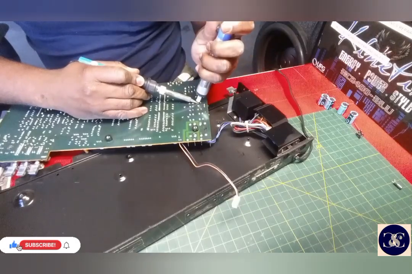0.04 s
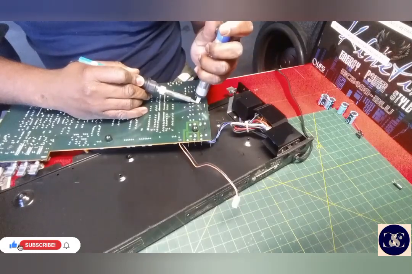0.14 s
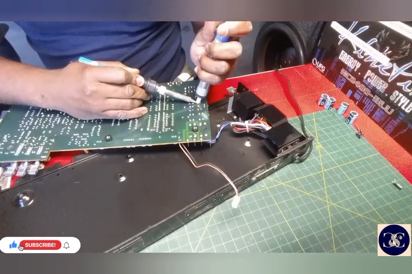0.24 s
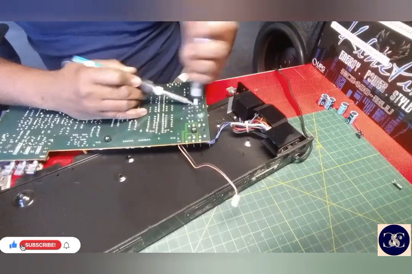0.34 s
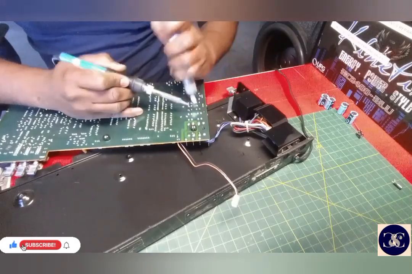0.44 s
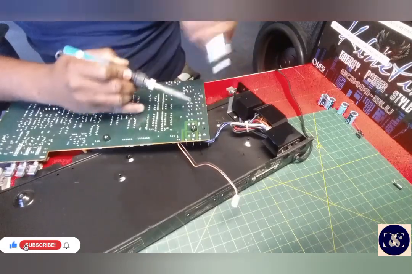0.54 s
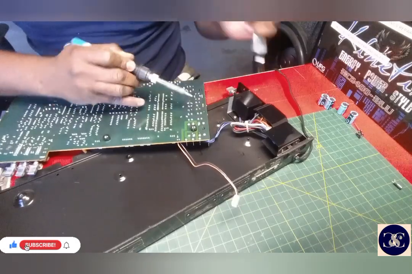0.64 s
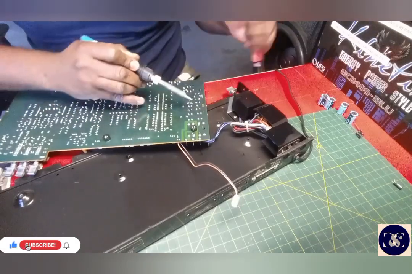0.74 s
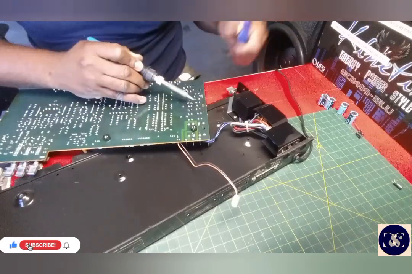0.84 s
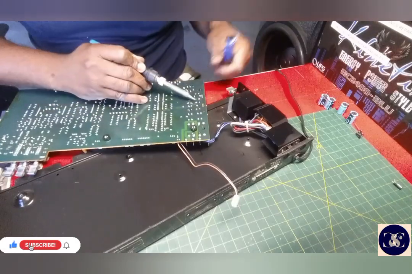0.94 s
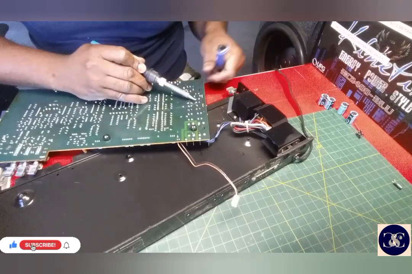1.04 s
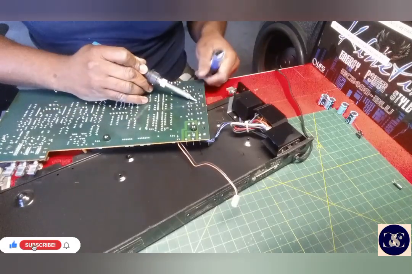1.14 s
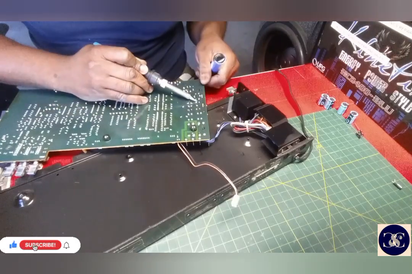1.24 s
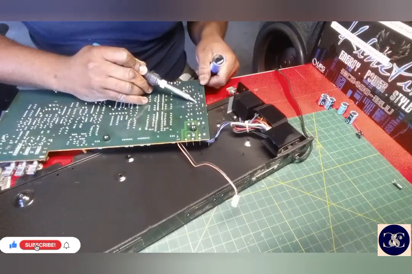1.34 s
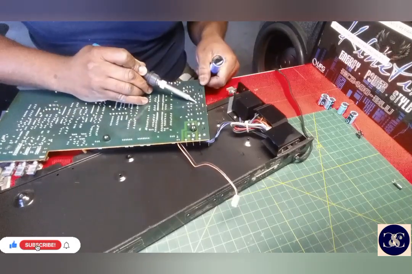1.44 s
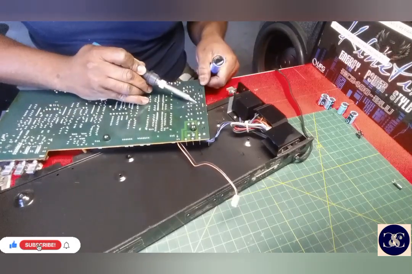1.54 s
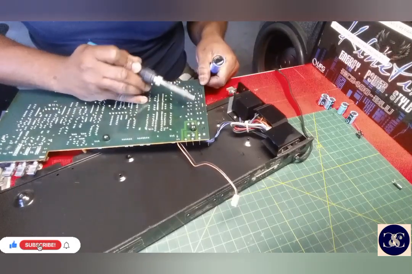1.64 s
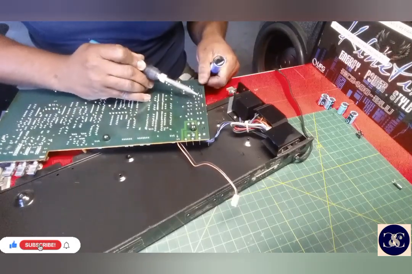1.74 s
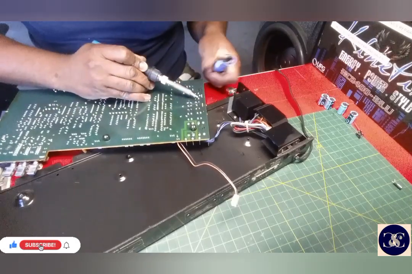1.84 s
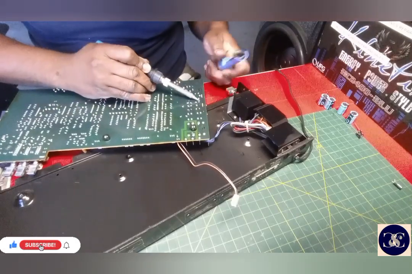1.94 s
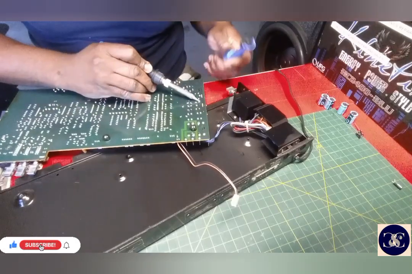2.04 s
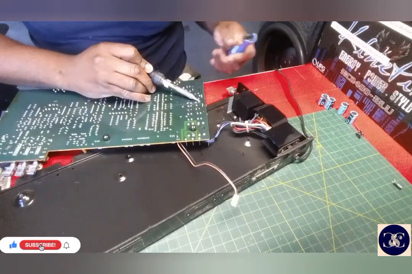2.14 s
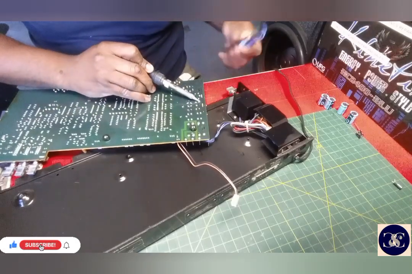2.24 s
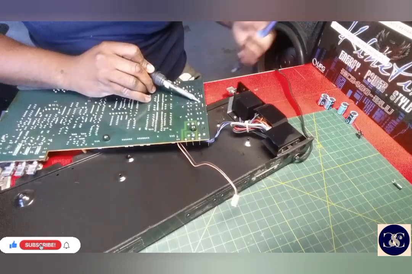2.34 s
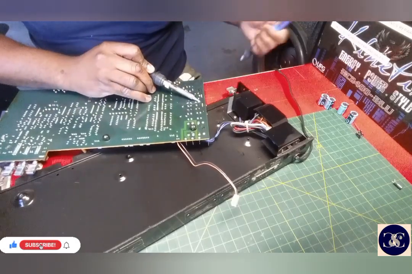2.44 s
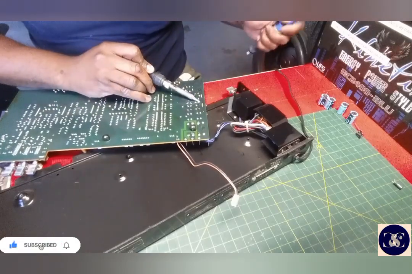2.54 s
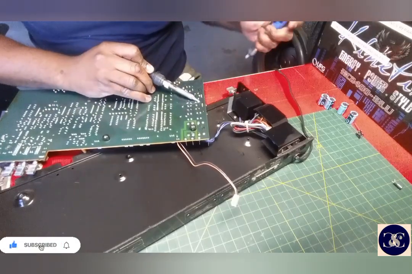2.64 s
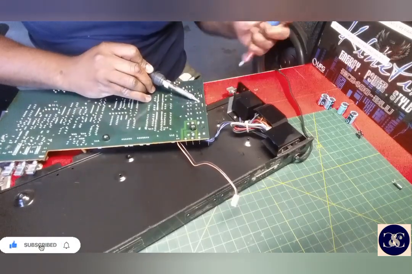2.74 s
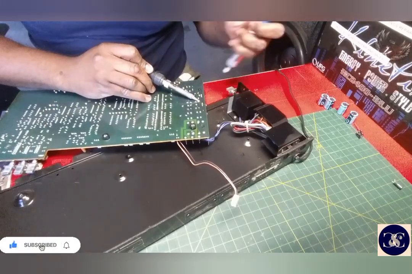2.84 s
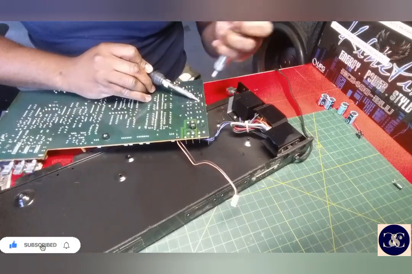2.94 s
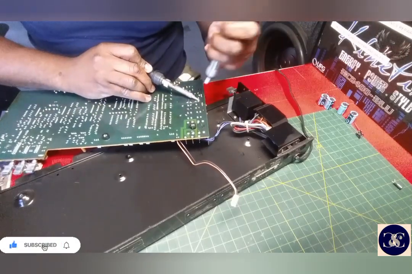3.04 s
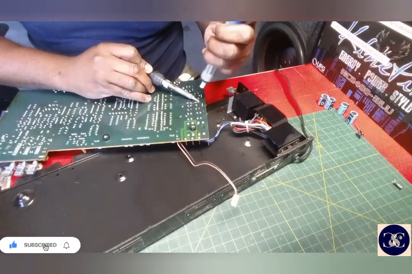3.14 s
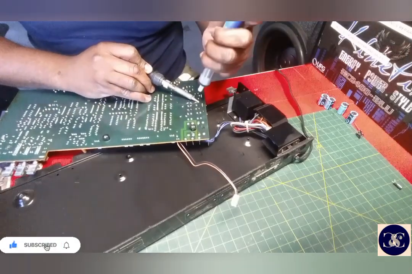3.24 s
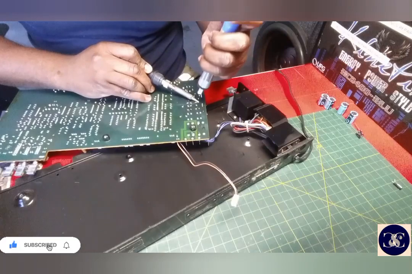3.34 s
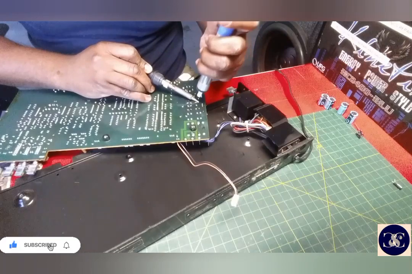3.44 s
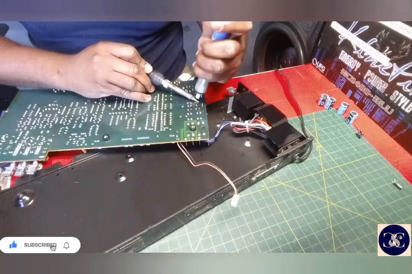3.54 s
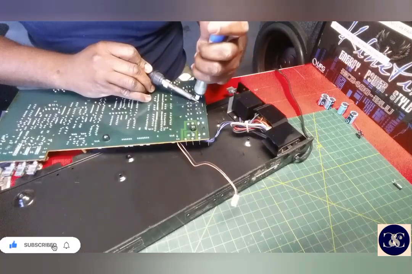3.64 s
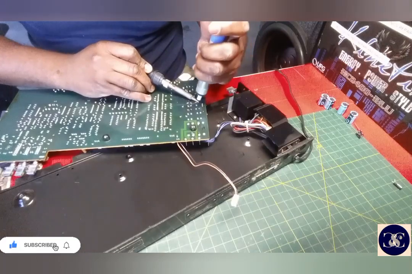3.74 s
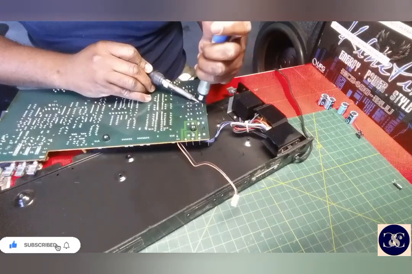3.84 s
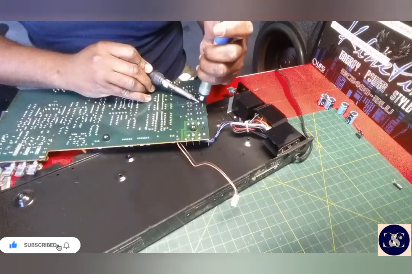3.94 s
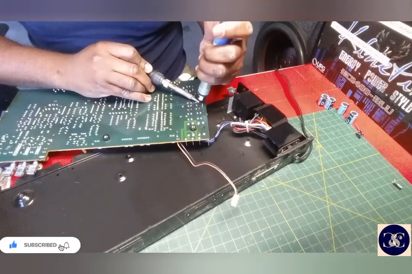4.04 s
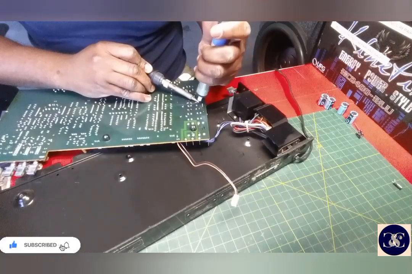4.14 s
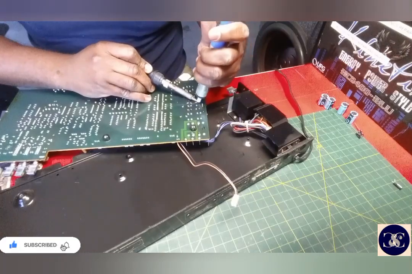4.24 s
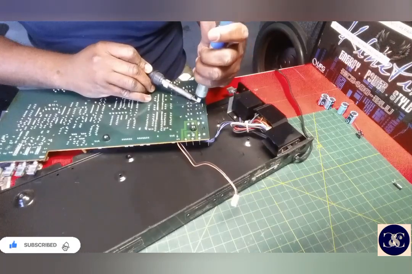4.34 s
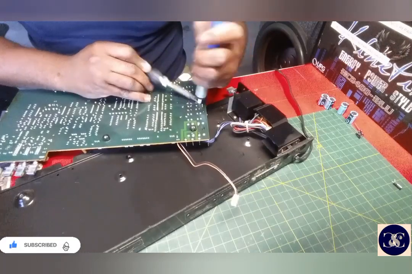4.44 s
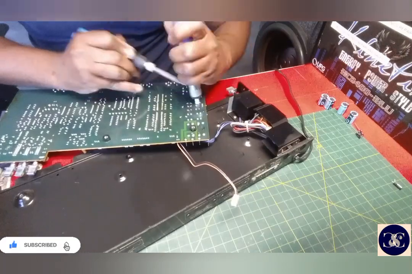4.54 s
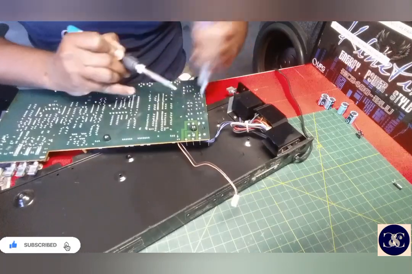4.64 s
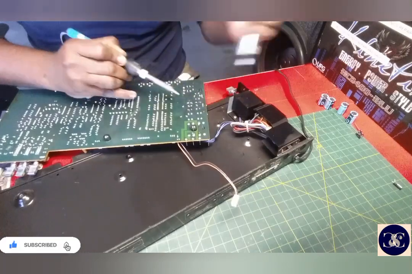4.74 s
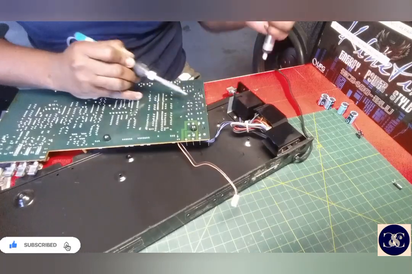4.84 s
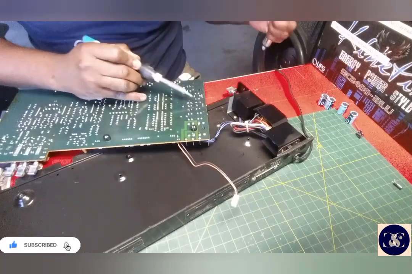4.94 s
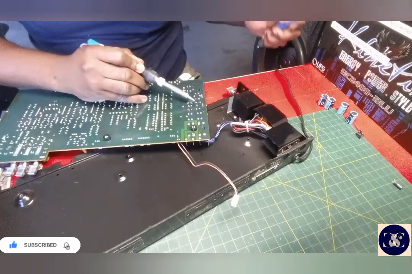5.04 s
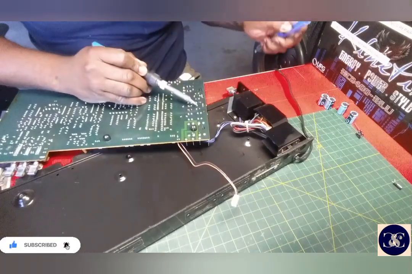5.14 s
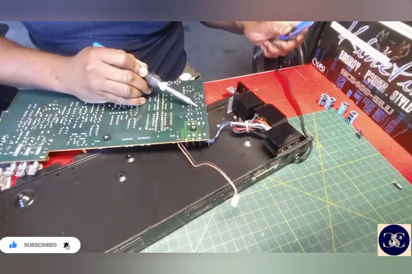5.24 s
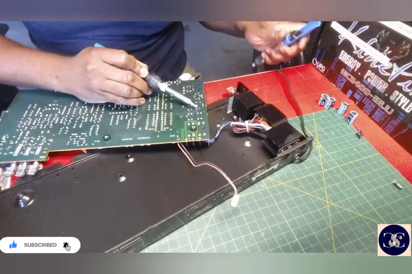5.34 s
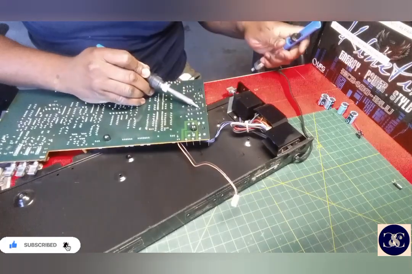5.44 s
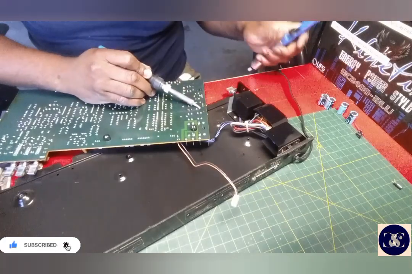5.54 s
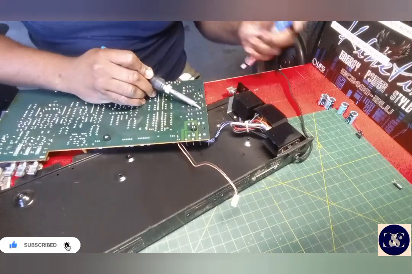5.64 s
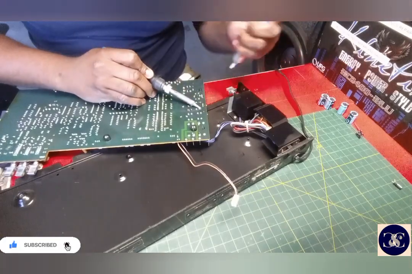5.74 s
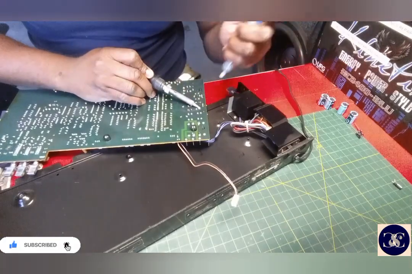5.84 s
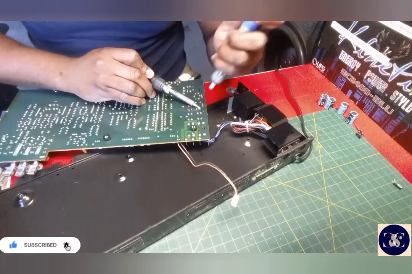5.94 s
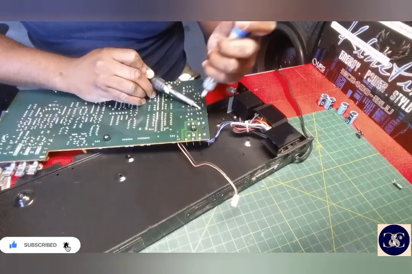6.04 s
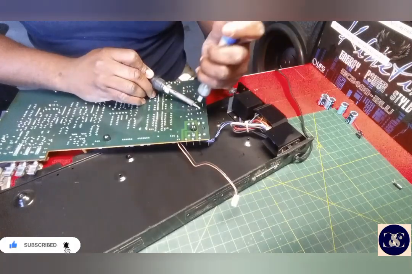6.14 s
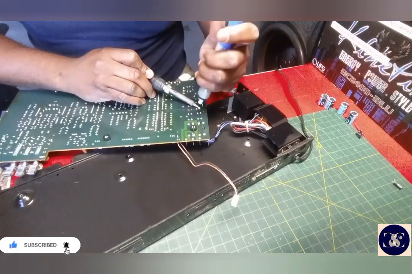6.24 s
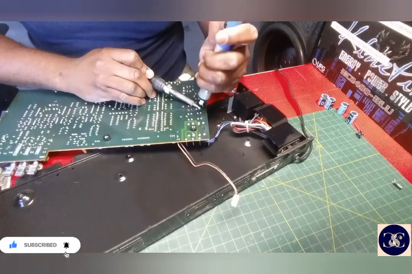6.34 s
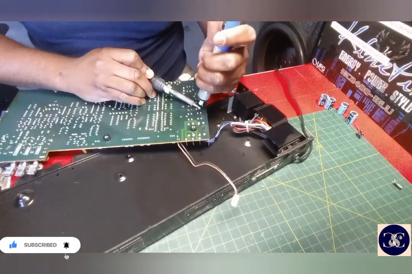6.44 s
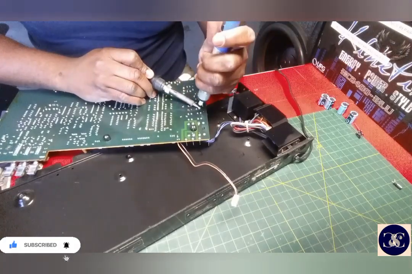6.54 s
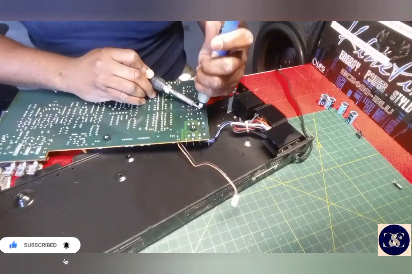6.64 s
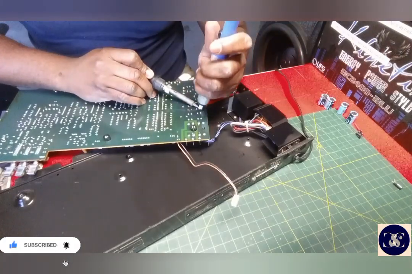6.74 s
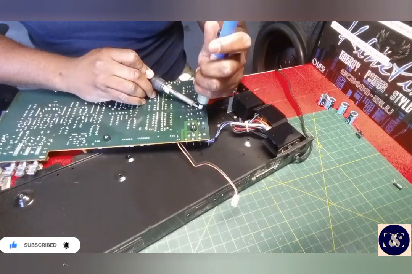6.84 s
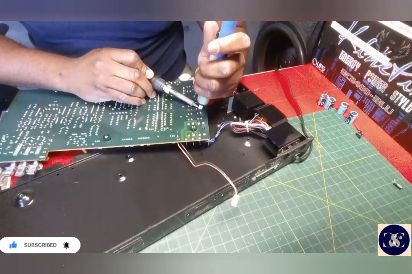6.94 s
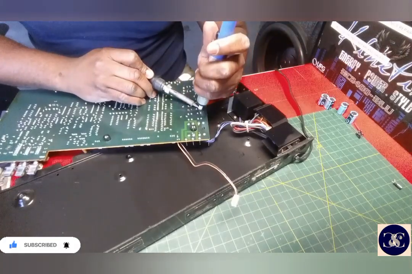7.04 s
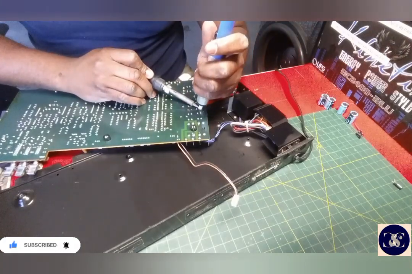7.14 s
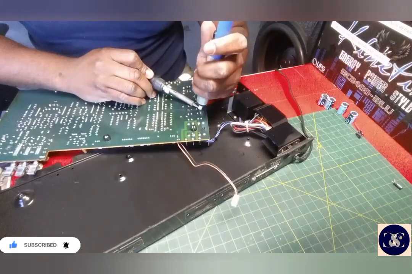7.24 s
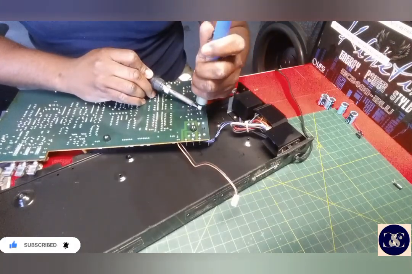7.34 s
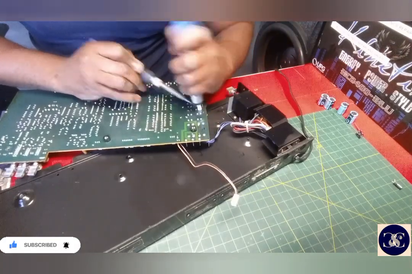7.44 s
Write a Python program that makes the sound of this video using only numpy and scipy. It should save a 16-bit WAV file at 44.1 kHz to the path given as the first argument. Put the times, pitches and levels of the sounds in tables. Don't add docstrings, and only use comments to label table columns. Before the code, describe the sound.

Irregular dry snaps and clicks of a hand-held plunger tool, recorded close in a small, lightly reverberant room. First a shot with thump and board taps, then small chiming knocks and a piercing latch click, then a bigger shot with springy rebound and another catch. Long gaps hold only a fluctuating low hum with faint airy hiss, until one final snap cuts off at the end.

```python
import sys
import numpy as np
from scipy import signal
from scipy.fft import rfft, irfft
from scipy.io import wavfile
from scipy.ndimage import uniform_filter1d

SR = 44100
rng = np.random.default_rng(int(sys.argv[2]) if len(sys.argv) > 2 else 0)


def log_audio(samples):
    frames = np.atleast_2d(samples).T
    limited = np.clip(frames, -1, 1)
    pcm = np.round(limited * 32767).astype(np.int16)
    wavfile.write(sys.argv[1], SR, pcm)


def attenuation_scalar(level_db):
    decades = np.asarray(level_db, float) / 20
    return 10 ** decades


N = 330750
T = np.arange(N) / SR

# centre in Hz, width in Hz, gain in dB.
TREBLE_BANDS = [(9970, 1700, 3), (11900, 6500, 0), (15200, 9700, -7)]
# frequency in Hz, level in dB, t60 in seconds.
BOARD_MODES = [(765, -8.5, 0.084), (1074, -3.5, 0.073), (1230, 1, 0.029), (1331.5, 1, 0.033),
               (1500, 1.5, 0.026), (1910, -8, 0.037), (2144, -4, .04), (2450, -9.5, .04)]


def unit(x):
    return x / np.sqrt(np.mean(x ** 2))


def colour(x, hz, db):
    size = 1 << 13
    log_hz = np.log(np.arange(size // 2 + 1) * SR / size + 1)
    cepstrum = irfft(np.interp(log_hz, np.log(hz), db) * np.log(10) / 20)
    cepstrum[1:size // 2] *= 2
    cepstrum[size // 2 + 1:] = 0
    return signal.oaconvolve(x, irfft(np.exp(rfft(cepstrum))))[:len(x)]


def resonate(x, bands):
    out = 0
    for k, (hz, width, db) in enumerate(bands):
        out = out + (-1) ** k * attenuation_scalar(db) * signal.lfilter(*signal.iirpeak(hz, hz / width, SR), x)
    return out


def ring(x, modes):
    out = 0
    for hz, db, t60 in modes:
        pole = np.exp(2j * np.pi * hz / SR - np.log(1000) / (t60 * SR))
        out = out + attenuation_scalar(db) * signal.lfilter([1], [1, -pole], x).imag
    return out


def bursts(s, db, t60, spiky_db):
    out, t = np.zeros(N), T[:SR // 4]
    uneven = attenuation_scalar(spiky_db * rng.standard_normal((len(s), len(t) // 8 + 1)))
    chance = rng.standard_normal((len(s), len(t))) * uneven.repeat(8, axis=1)[:, :len(t)]
    for at, level, decay, c in zip((s * SR).astype(int), attenuation_scalar(db), np.clip(t60, 0.003, 0.3), chance):
        crack = c * np.exp(-t / min(0.08 * decay, 0.0035))
        rattle = 0.42 * c * np.exp(-np.log(1000) * t / decay)
        hit = rattle + 4.5 * crack / np.sqrt(np.sum(crack ** 2))
        out[at:at + len(t)] += (level * hit)[:N - at]
    return out


def walk(rate):
    k = int(SR / rate)
    held = np.repeat(rng.standard_normal(N // k + 1), k)
    return unit(uniform_filter1d(uniform_filter1d(held, k), k)[:N])


def after(x, hz):
    t60_s = 0.91
    keep = np.exp(-2 * np.log(1000) / (t60_s * SR))
    return np.sqrt(signal.lfilter([1 - keep], [1, -keep], resonate(x, [(hz, hz / 2, 0)]) ** 2))


def fan(near):
    # time in seconds, hum level in dB.
    opening = [(0.0, -52.5), (0.25, -48), (0.48, -37), (1.02, -55.5), (1.52, -51), (1.9, -37), (2.44, -40),
               (2.82, -49), (3.28, -52.5), (3.86, -48.5), (4.07, -42), (4.51, -38), (4.95, -54),
               (5.66, -58), (6.04, -53.5), (6.62, -40.5), (7.08, -38), (7.5, -37)]
    # frequency in Hz, wander in Hz, level in dB.
    tones = [(57.5, 7.0, -5.5), (117.7, 1.5, -2), (192, 5.8, -25.5), (228, 2.1, -25), (359.5, 0.82, -35)]
    # frequency in Hz, density in dB per Hz.
    rumble_curve = [(15, -42), (25, -16.5), (71, -3.5), (103, -4.5), (124, -1.5), (146, -4), (183, -15.5),
                    (322, -30), (500, -43), (650, -70), (1100, -120)]
    rush_curve = [(180, -24.5), (300, -3), (755, -14), (1150, -12), (1540, -17.5), (3940, -28), (4590, -32),
                  (7190, -30), (8500, -47.5), (11000, -72.5), (18700, -120)]
    hiss_curve = [(4710, -47), (8000, -13.5), (8340, -16), (10200, -11), (15100, -2), (16200, -7.5),
                  (16400, -18.5)]

    hum_db = np.interp(T, *np.transpose(opening))
    rise = hum_db + 40
    hands = np.clip(np.minimum(T - 1.68, 2.68 - T) / 0.02, 0, 1)
    rush_gain = attenuation_scalar(-64.5 + 1.6 * rise) + attenuation_scalar(-88) + attenuation_scalar(-22) * after(near, hz=1300) + attenuation_scalar(-61) * hands
    hiss_gain = attenuation_scalar(-76.5 + 1.4 * rise) + attenuation_scalar(-92.5) + attenuation_scalar(-30.5) * after(near, hz=10500) + attenuation_scalar(-69.5) * hands

    lines = 0
    for hz, width, db in tones:
        level = attenuation_scalar(db + 1.5 * walk(9))
        lines = lines + level * np.sin(np.cumsum(hz + width * walk(13)) * 2 * np.pi / SR)
    mid, side = (unit(colour(rng.standard_normal(N), *np.transpose(rumble_curve))) for _ in range(2))
    side = signal.lfilter(*signal.butter(2, 260, "high", fs=SR), side)
    hum = unit(lines) + attenuation_scalar(-2) * (mid + 0.67 * side * np.array([[1], [-1]]))

    rush, hiss = (np.array([unit(colour(rng.standard_normal(N), *np.transpose(curve))) for _ in range(2)])
                  for curve in (rush_curve, hiss_curve))
    rush = rush_gain * attenuation_scalar(walk(12)) * rush
    hiss = hiss_gain * attenuation_scalar(0.72 * walk(15)) * hiss
    return attenuation_scalar(hum_db + 1.0) * hum + rush + hiss


def bench():
    # start in seconds, peak in dB.
    thumps = [(0.251, -37), (0.443, -20.5), (0.468, -18), (0.499, -28.5), (0.591, -33), (0.622, -29.5),
              (1.733, -29), (1.799, -31), (1.961, -25), (2.039, -31), (2.081, -38.5), (4.503, -28.5),
              (4.547, -25.5), (4.57, -13.5), (4.589, -17), (4.609, -16.5), (4.634, -23.5), (7.479, -26),
              (7.491, -22)]
    # frequency in Hz, level in dB, t60 in seconds.
    bench_modes = [(94.4, -4.5, 0.079), (139.7, 1.5, .12), (191, -5, 0.14), (231.5, -0.5, .09),
                   (374, -5.5, 0.054), (500, -14, 0.14)]
    soft_tilt = 0.15
    hold = 0.83
    s, db = np.transpose(thumps)
    out, t = np.zeros(N), T[:SR // 3]
    chance = rng.standard_normal((len(s), len(bench_modes), 2))
    for at, level, draws in zip((s * SR).astype(int), db, chance):
        modes = 0
        for (hz, mode_db, t60), (a, b) in zip(bench_modes, draws):
            tilt_db = soft_tilt * (level + 14.5) * np.log2(hz / 140)
            gain = attenuation_scalar(mode_db + tilt_db + 1.8 * a) * np.sign(b)
            decay = np.exp(-np.log(1000) * t / (t60 * hold))
            modes = modes + gain * np.sin(2 * np.pi * hz * (1 + 0.051 * b) * t) * decay
        push = 1 - np.exp(-t / 0.0013)
        out[at:at + len(t)] += (attenuation_scalar(level - 2.5) * modes * push)[:N - at]
    return out


def barrel(x):
    # centre in Hz, width in Hz, gain in dB.
    tube_bands = [(3260, 810, -9), (4170, 360, -3.5), (4700, 430, -2), (5500, 810, -3), (6300, 1000, -1.5),
                  (7400, 630, -1.5)]
    passband = signal.butter(3, [2850, 8300], "band", fs=SR, output="sos")
    return signal.sosfilt(passband, resonate(x, tube_bands))


def pump():
    # start in seconds, peak in dB, treble in dB re peak, board in dB re peak.
    stops = [(0.4488, -6, -13.5, -13), (1.7318, -13.5, -11, -15.5), (1.8953, -12.5, -17.5, -25),
             (1.939, -18, -14, -16), (2.3375, -26.5, -16.5, -20), (2.7642, -8, -11.5, -29.5),
             (2.9712, -9.5, -22, -23.5), (4.574, -0.5, -19, -12), (4.7612, -22, -29.5, -5.5),
             (5.093, -16, -9.5, -42.5), (2.606, -12.5, -12.5, -32.5), (5.2995, -19.5, -10, -29.5),
             (7.4939, -10.5, -13, -11.5)]
    rattles = [(0.4185, -23.5, -11, -7), (0.4672, -13.5, -18.5, -12), (0.4972, -16, -17, -11),
               (0.509, -21, -16, -17), (0.5865, -23.5, -21.5, -6.5), (1.6524, -45.5, -12, -4),
               (1.6593, -37, -24.5, -14), (2.0369, -31, -14, -7.5), (2.149, -36, -19.5, -12.5),
               (2.1914, -46, -14, -13.5), (2.358, -26, -10.5, -21), (2.4763, -45, -2, -10),
               (2.558, -11, -21.5, -32), (2.461, -48, -16, -19), (0.9107, -68, -21, -11),
               (2.9272, -45.5, -23.5, -12), (2.9755, -9, -21, -17.5), (4.5934, -9, -18, -14),
               (4.634, -16, -16, -12), (4.6902, -29, -14.5, -6.5), (4.9372, -60, -17.5, -4),
               (7.3107, -52, -12, -23.5)]
    catches = [
        (2.556, -10, -17, -34),
        (2.6031, 3, -12, -31),
        (5.0908, -6.5, -8, -36),
    ]
    # start in seconds, peak in dB, board in dB re peak.
    thumb = [
        (1.709, -40.5, -4.5),
        (4.541, -39.5, -4),
        (4.564, -23.5, -6.5),
        (5.059, -34.5, -26),
        (7.453, -44, -9),
        (7.475, -43.5, 2),
        (7.487, -27, -6),
    ]
    rows = [(*r, 0.042) for r in stops] + [(*r, 0.12) for r in rattles] + [(*r, 0.022) for r in catches]
    rows += [(at, peak, -9, under_db, 0.05) for at, peak, under_db in thumb]
    s, db, top_db, board_db, t60 = np.transpose(rows)
    body = attenuation_scalar(-2.0) * barrel(bursts(s, db, t60, spiky_db=3.0))
    top = attenuation_scalar(8.0) * resonate(bursts(s, db + top_db, 1.1 * t60, spiky_db=2.0), TREBLE_BANDS)
    under = bursts(s, db + board_db, 0.67 * t60, spiky_db=1.0)
    return body + top + attenuation_scalar(-31) * ring(under, BOARD_MODES) + attenuation_scalar(10.0) * resonate(under, [(1860, 1400, 0)])


def plunger():
    # arrival in seconds, level in dB, lower rasp in dB re level.
    rushes = [
        (0.448, -25.5, -8.5),
        (2.765, -28.5, -24),
        (5.298, -37.5, -48),
        (7.5, -17, -5.5),
    ]
    # start in seconds, level in dB, lower rasp in dB re level, fall in dB per second.
    puffs = [
        (0.455, -26.5, -2.5, 198.5),
        (0.59, -47.5, -10, 236),
        (2.562, -26.5, -18.5, 249),
        (2.615, -31.5, -21.5, 190),
        (2.98, -42, 2.5, 199.5),
        (4.58, -22, 0.5, 289),
        (5.108, -43, -26.5, 202),
    ]
    # start in seconds, swell in seconds, hold in seconds, level in dB, lower rasp in dB re level.
    pushes = [
        (2.497, .012, .043, -34, -14),
        (4.974, .075, .012, -41, -13.5),
    ]
    strokes = []
    for s, db, rasp_db in rushes:
        run_up = (T < s) * (T > s - 0.008)
        strokes.append((run_up * attenuation_scalar(db - 800 * abs(s - T)), rasp_db))
    for s, db, rasp_db, fall in puffs:
        strokes.append(((T > s) * attenuation_scalar(db - fall * abs(T - s)), rasp_db))
    for s, swell, hold, db, rasp_db in pushes:
        rise_db = 14 * np.clip(1 - (T - s) / swell, 0, 1)
        fall_db = 703.5 * np.maximum(T - s - swell - hold, 0)
        strokes.append(((T > s) * attenuation_scalar(db - rise_db - fall_db), rasp_db))
    air = sum(envelope for envelope, _ in strokes)
    rasp = sum(envelope * attenuation_scalar(rasp_db) for envelope, rasp_db in strokes)
    rub = rng.standard_normal(N) * attenuation_scalar(1.6 * walk(200) + 2.8 * walk(1200))
    body = attenuation_scalar(-5.0) * air * unit(barrel(rub))
    top = attenuation_scalar(-6) * air * unit(resonate(rub, TREBLE_BANDS))
    return body + top + attenuation_scalar(-3.5) * rasp * unit(resonate(rub, [(1130, 580, -4), (2100, 1000, -1.5)]))


def spring():
    # start in seconds, peak in dB.
    twangs = [
        (0.5861, -45),
        (1.735, -44.5),
        (1.9438, -41.5),
        (2.3585, -55.5),
        (2.972, -30.5),
        (4.573, -24.5),
        (4.5929, -24.5),
        (4.613, -25.5),
        (4.634, -28),
    ]
    # frequency in Hz, level in dB, t60 in seconds.
    coil_modes = [(2131, -9, .09), (2428, -8, 0.09), (2598, -7, .15), (2613, 0, .2), (4130, -13.5, .06),
                  (7080, -13.5, .06)]
    s, db = np.transpose(twangs)
    blows = np.zeros(N)
    blows[(s * SR).astype(int)] = attenuation_scalar(db)
    return ring(blows, coil_modes)


def board():
    # start in seconds, peak in dB, edge in dB re peak.
    knocks = [(0.602, -26.5, -11), (0.625, -25.5, -13.5), (0.653, -32, -23), (0.689, -46, -23),
              (1.241, -60, -3), (1.544, -61, -15), (1.632, -61.5, 12.5), (1.749, -32, 3.5),
              (1.771, -37.5, -25), (1.798, -36, -10), (1.854, -45, 2.5), (1.951, -21, -3),
              (2.014, -35.5, -22), (2.038, -29, -5), (2.081, -32, -10), (2.725, -39, -12),
              (2.883, -54.5, -1.5), (3.27, -61, -19.5), (4.504, -29.5, -10.5), (4.516, -35.5, -10),
              (4.711, -23, -2), (4.803, -35.5, -13), (4.844, -44.5, -18.5), (5.66, -59.5, -14),
              (5.675, -72.5, -6), (5.725, -82, 10)]
    s, db, edge_db = np.transpose(knocks)
    t60 = np.full(len(s), 0.055)
    tap = bursts(s, db, t60, spiky_db=1.0)
    tick = attenuation_scalar(1.5) * barrel(bursts(s, db + edge_db, t60, spiky_db=3.0))
    knock = attenuation_scalar(0.5) * resonate(tap, [(1530, 650, -0.5), (2280, 900, -4)])
    return attenuation_scalar(-30) * ring(tap, BOARD_MODES) + knock + tick


def cap():
    # start in seconds, peak in dB.
    turns = [
        (1.659, -45),
        (1.731, -18),
        (1.894, -21.5),
        (1.94, -23.5),
    ]
    # centre in Hz, width in Hz, gain in dB.
    cap_bands = [(6200, 350, 0.5), (7280, 370, 1.5), (10660, 700, -4)]
    s, db = np.transpose(turns)
    return attenuation_scalar(7) * resonate(bursts(s, db, np.full(len(s), 0.089), spiky_db=2.5), cap_bands)


def room(x):
    # frequency in Hz, t60 in seconds.
    reverb = [(150, 0.29), (1000, 0.39), (3000, 0.44), (7000, 0.11), (14000, .18)]
    t, hz = T[:SR // 2], 150 * 2.0 ** np.arange(7)
    reverb_hz, reverb_s = np.transpose(reverb)
    t60 = np.interp(np.log(hz), np.log(reverb_hz), reverb_s)
    tail = 0
    for f, d in zip(1.5 * hz, t60):
        noise = rng.standard_normal((2, len(t)))
        tail = tail + resonate(noise, [(f, 0.99 * f, 0)]) * np.exp(-np.log(1000) * t / d)
    tail = tail * (1 - np.exp(-(t / 0.023) ** 2))
    tail = tail / np.sqrt(np.sum(tail[0] ** 2))
    return attenuation_scalar(-18) * signal.oaconvolve(x[None], tail, axes=1)[:, :N]


def scatter(near):
    t = T[:SR // 100]
    paths = rng.standard_normal((4, 2, len(t))) * np.exp(-t / 0.0025)
    moves = np.array([walk(4) for _ in paths])
    moves = moves / np.sqrt(np.sum(moves ** 2, axis=0))
    early = 0
    for move, path in zip(moves, paths):
        path = path / np.sqrt(np.sum(path ** 2, axis=1, keepdims=True))
        early = early + signal.oaconvolve((move * near)[None], path, axes=1)[:, :N]
    return early


def scene():
    near = pump() + cap() + board() + plunger()
    twang, low = spring(), bench()
    late = np.pad(near, (int(0.00007 * SR), 0))[:N]
    direct = np.array([near, late]) + twang * attenuation_scalar([[2.5], [-2.5]]) + low * attenuation_scalar([[1.5], [-1.5]])
    return direct + scatter(near) + room(near + 0.4 * twang + 1.1 * low) + fan(near)


def top_cut(x):
    return signal.sosfilt(signal.butter(12, 16640, fs=SR, output="sos"), x)


def record(dry):
    # frequency in Hz, left gain in dB, right gain in dB.
    port_gains = [(60, -0.8, -1.7), (300, 0.5, -1), (1300, 2.5, -1.5), (2500, 4, -0.5), (3973, 6.5, -6.5),
                  (6160, 6, -17.5), (8040, 5.5, -8.5), (9100, 0.5, 3.5), (10500, -8.5, 5), (12700, -2, -3),
                  (16400, -4, -1.5)]
    hz, *gains = np.transpose(port_gains)
    x = np.array([colour(c, hz, db) for c, db in zip(dry, gains)])
    x = x - 0.25 * resonate(x, [(8780, 1200, 0)])
    low_pass = signal.ellip(8, 0.2, 60, 16300, fs=SR, output="sos")
    x = signal.sosfilt(low_pass, np.clip(x, -1, 1))
    return top_cut(x)


dry = scene()
out = record(dry)
log_audio(out)
```